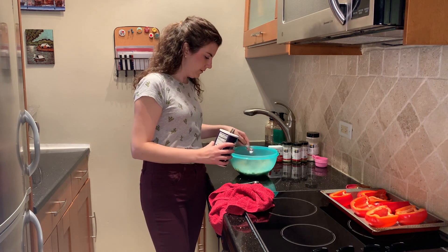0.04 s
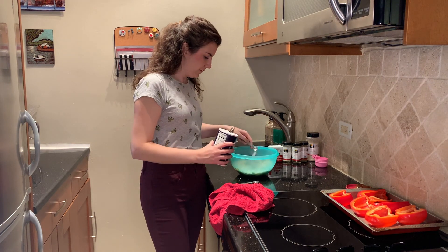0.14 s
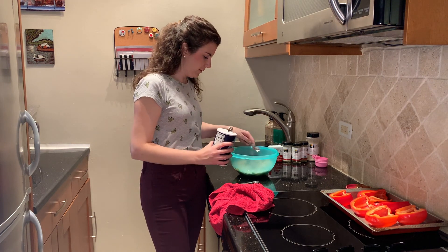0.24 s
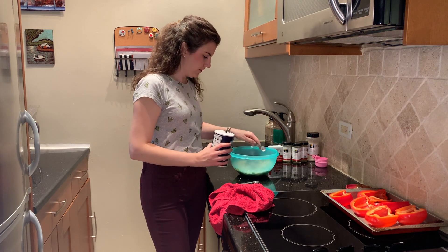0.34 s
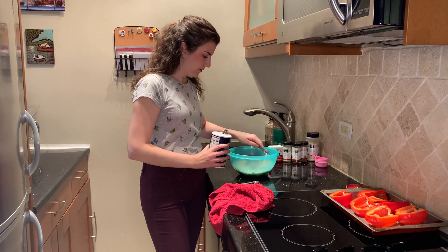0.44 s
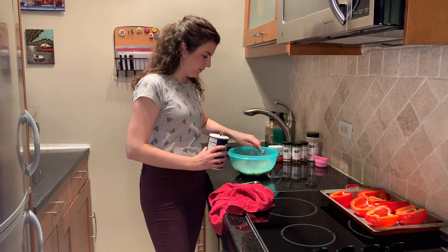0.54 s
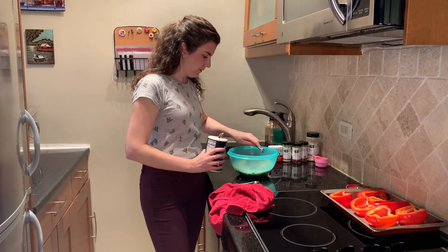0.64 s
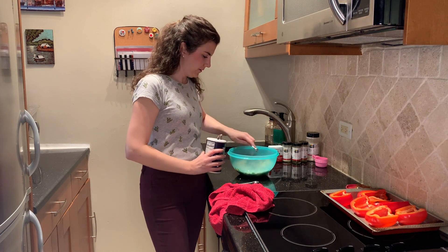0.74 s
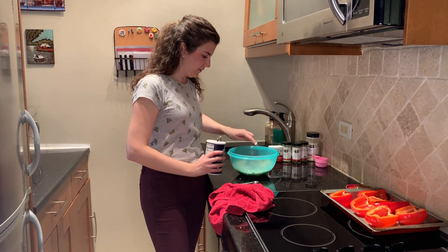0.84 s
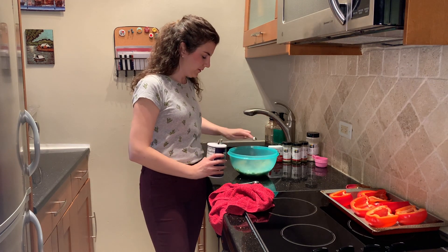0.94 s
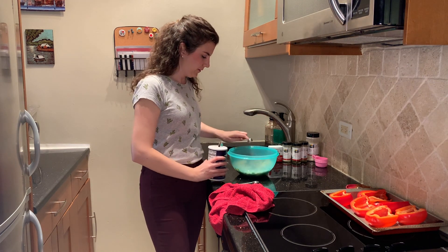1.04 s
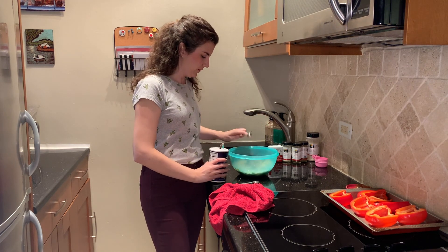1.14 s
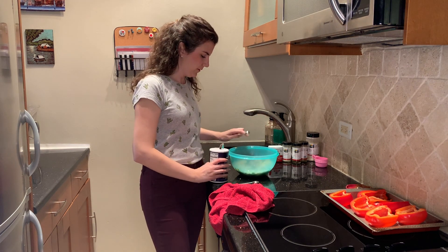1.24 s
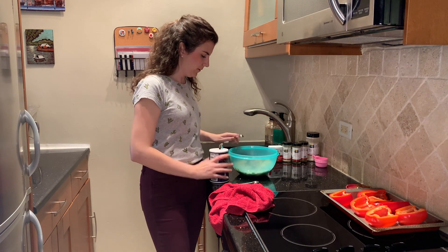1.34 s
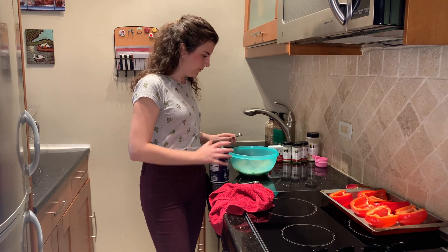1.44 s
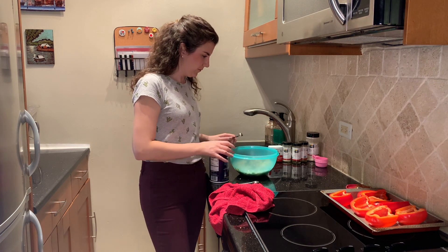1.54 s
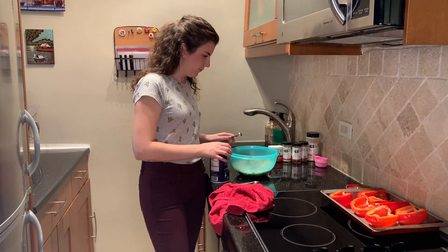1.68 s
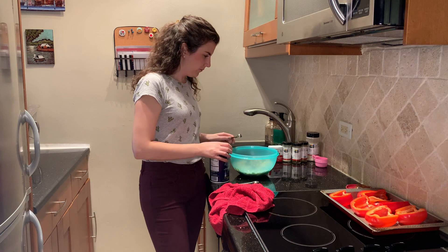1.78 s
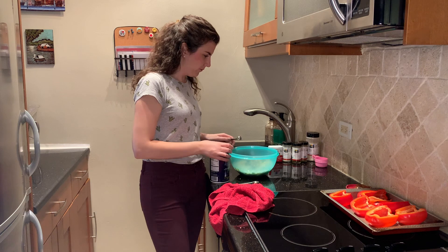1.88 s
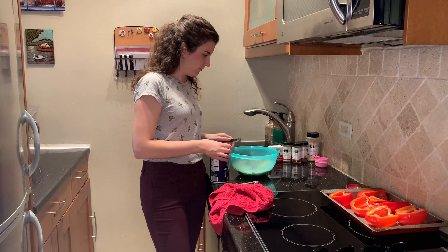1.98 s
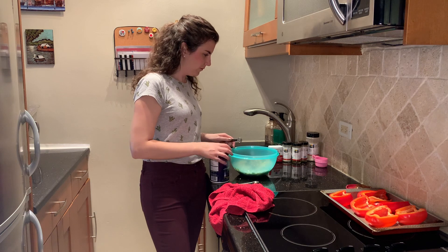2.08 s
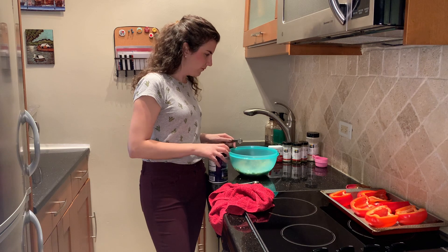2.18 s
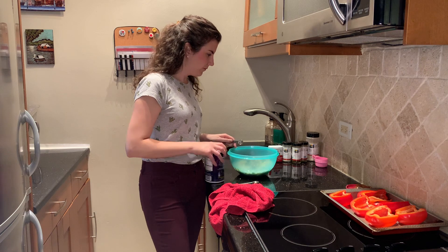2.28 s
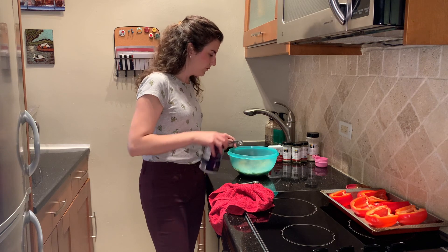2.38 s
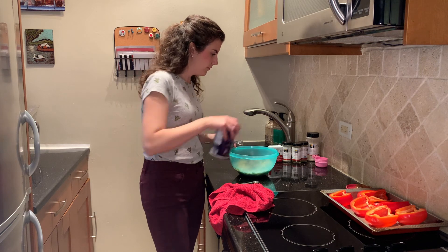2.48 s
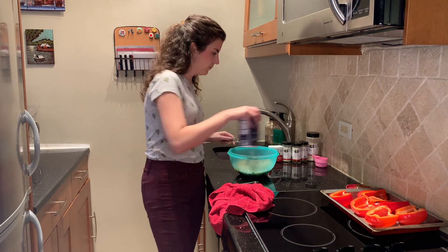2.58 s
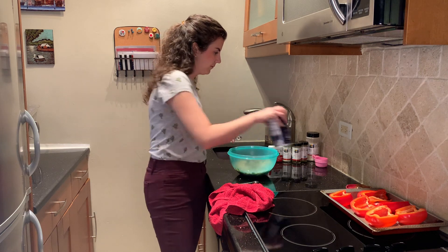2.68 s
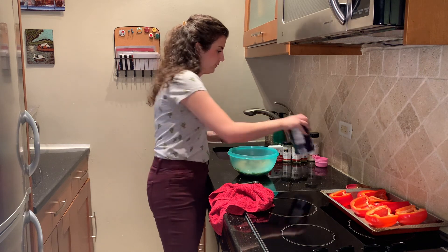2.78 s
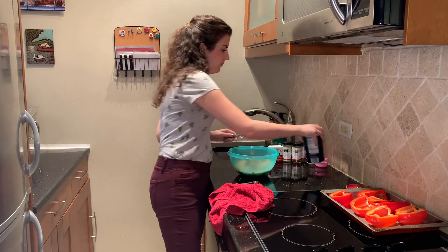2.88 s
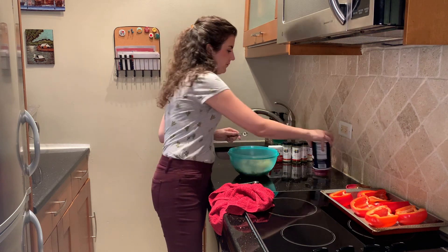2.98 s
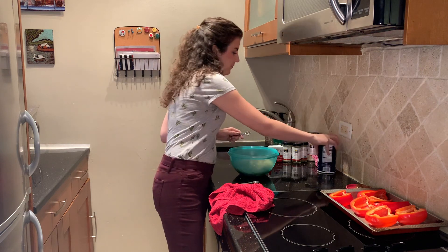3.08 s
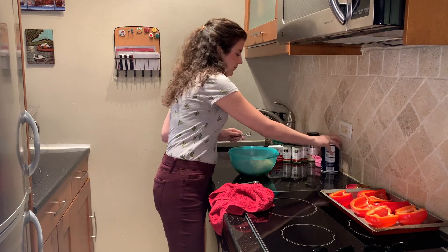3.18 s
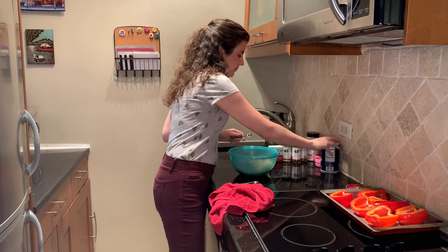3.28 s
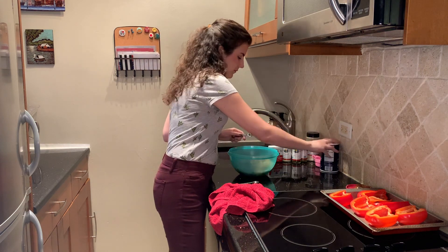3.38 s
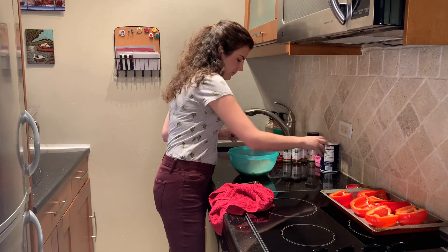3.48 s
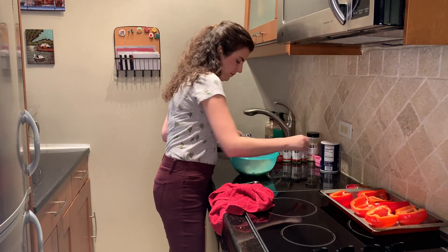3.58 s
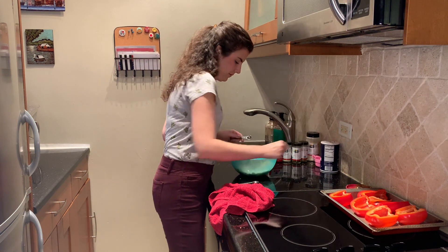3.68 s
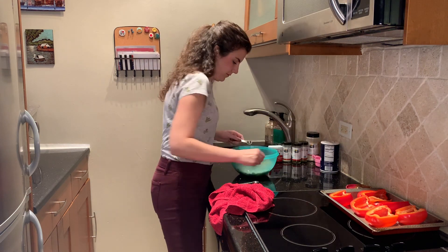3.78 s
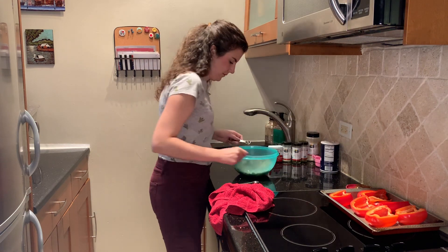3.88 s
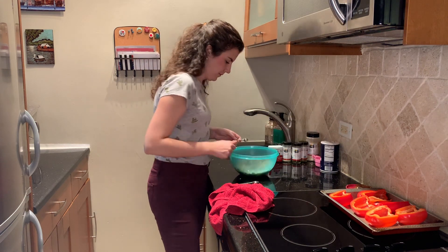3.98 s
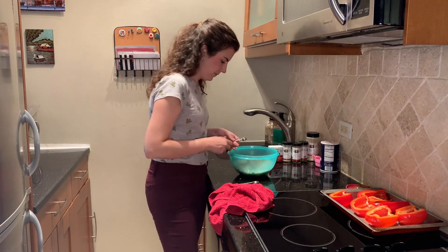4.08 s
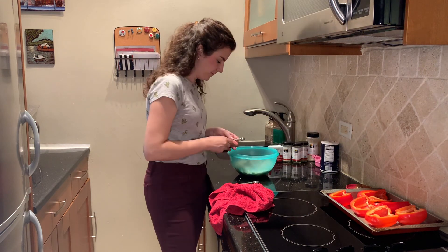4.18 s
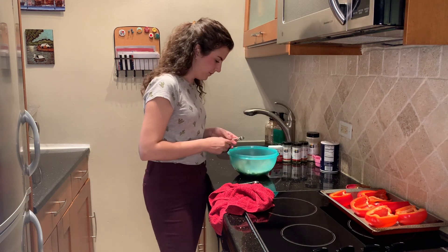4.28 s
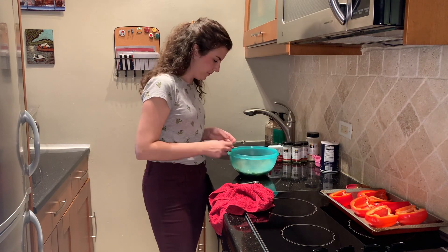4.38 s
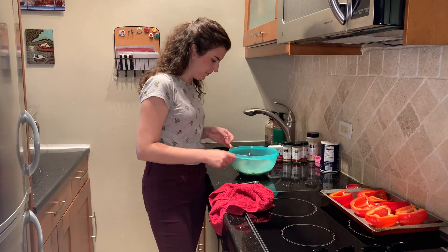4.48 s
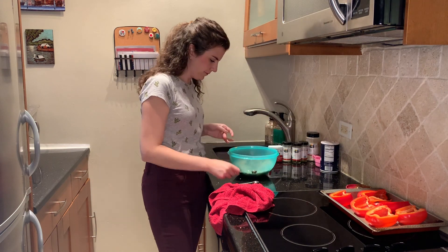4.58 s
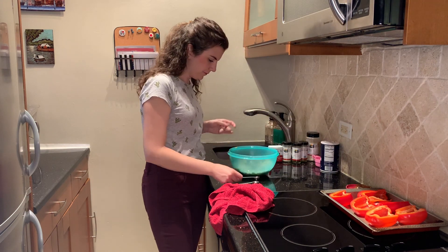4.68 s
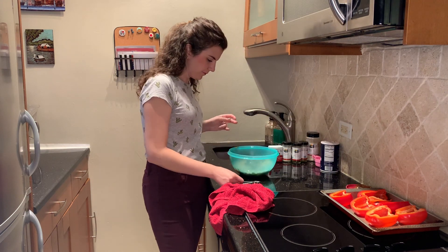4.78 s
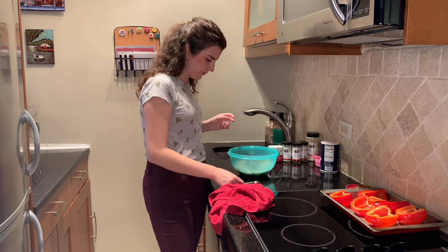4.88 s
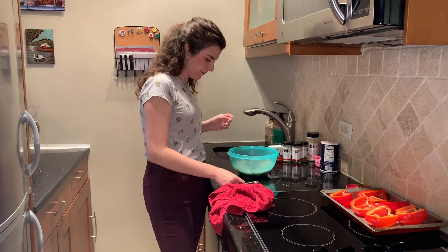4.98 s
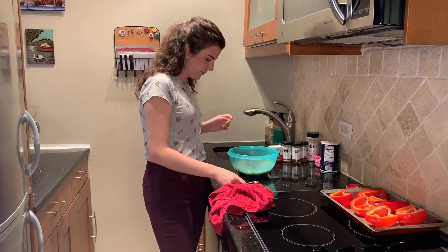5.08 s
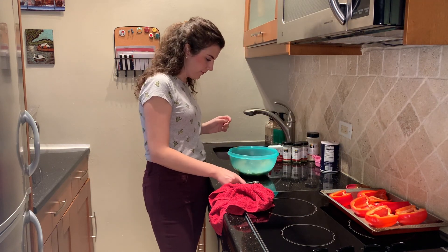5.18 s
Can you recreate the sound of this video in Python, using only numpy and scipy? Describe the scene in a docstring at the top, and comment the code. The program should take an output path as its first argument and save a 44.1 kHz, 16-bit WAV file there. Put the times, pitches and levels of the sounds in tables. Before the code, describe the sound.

In a small tiled kitchen over low rumble, a cardboard salt carton ticks, scrapes and snaps shut, then is put down on the counter.

```python
"""A cardboard salt carton is handled in a small tiled kitchen, over low rumble, two loose hums and a hiss.
Salt and fingers slide and tick (coloured random grains, short ringing blips); the carton is set on the hob
(brief contacts excite damped modes); its spout scrapes and squeaks shut (friction noise through resonances)
and snaps, with a rustling tail; lifted, the salt slides inside; the carton is put down at the back of the
counter. Decaying noise, band by band, echoes all handling."""
import sys
import numpy as np
from scipy import signal
from scipy.fft import rfft, irfft, next_fast_len
from scipy.io import wavfile

SR = 44100
rng = np.random.default_rng(int(sys.argv[2]) if len(sys.argv) > 2 else 0)


def generate_wav(sig):
    """Save sig (samples, or channels by samples) to the path in sys.argv[1] as 16-bit PCM at SR."""
    pcm = np.round(np.clip(np.atleast_2d(sig).T, -1, 1) * 32767).astype(np.int16)
    wavfile.write(sys.argv[1], SR, pcm)


N = 230946
TIME = np.arange(N) / SR  # seconds
EDGES = 22 * 2 ** np.arange(0, 9.7, 1 / 3)  # third-octave band edges, Hz

# Spectrum of appliances, ventilation and hiss, before level scaling: pitch_hz, density_db_per_hz
RUMBLE = [(20, -31), (41, -17.5), (62, -5), (100, -5.5), (141, -9.5), (240, -6.5), (394, -11.5), (500, -16),
          (620, -17.5), (900, -23.5), (1480, -48), (3000, -49.5), (6900, -58.5), (9000, -53.5),
          (16000, -53)]
# Course of the rumble's low part: time_s, level_db
RUMBLE_LEVEL = [(0.0, -53), (0.6, -55.5), (1.3, -52.5), (1.6, -55.5), (2.9, -55), (3.2, -49.5),
                (3.55, -55.5), (5.24, -54)]
STEADY_ABOVE_HZ, STEADY_DB = 1300, -51.5
# Left-right correlation of the noise bands as generated: pitch_hz, likeness (0 to 1)
LIKENESS = [(60, 0.93), (130, 0.89), (200, 0.89), (380, 0.39), (700, 0.12), (1300, 0.08), (16000, 0.017)]
# Course of the two hums: time_s, lower_level_db, upper_level_db
HUM = [(0.0, -69, -50.5), (0.4, -81, -72), (0.9, -63, -59), (1.4, -63, -55), (1.9, -54.5, -62.5),
       (2.8, -60.5, -61), (3.45, -54, -61.5), (3.65, -70.5, -62.5), (5.24, -58.5, -59.5)]
# Mean pitches of the lower and upper hum: pitch_hz
HUM_HZ = (56.7, 80.2)

# Slides of salt and fingers on cardboard, and the rustling tail of the snap at 1.874 s, one swell each:
# peak_s, rise_s, fall_s, bright_rush_db, dull_rub_db, finest_grains_db
SLIDES = [(0.807, 0.027, 0.065, -74.5, -71.5, -85), (0.98, 0.041, 0.04, -80.5, -88, -82),
          (1.09, 0.049, 0.043, -79.5, -97, -78), (1.149, 0.028, 0.055, -77, -69, -73),
          (1.285, 0.037, 0.03, -61, -74, -73), (1.322, 0.046, 0.035, -71, -65, -65),
          (1.874, 0.045, 0.12, -75, -40.5, -82), (2.06, 0.12, 0.07, -81, -58, -77),
          (2.205, 0.11, 0.084, -75.5, -67, -76), (2.484, 0.12, 0.16, -65.5, -82.5, -61),
          (2.69, 0.097, 0.29, -82, -76.5, -98), (2.834, 0.094, 0.093, -59, -73.5, -72),
          (2.93, 0.11, 0.11, -82, -72.5, -63), (3.069, 0.049, 0.14, -70, -51.5, -59.5),
          (3.19, 0.07, 0.19, -77, -61.5, -72), (3.305, 0.073, 0.056, -73, -76, -82),
          (3.389, 0.073, 0.036, -86, -62, -83), (3.66, 0.028, 0.055, -86, -99, -71),
          (3.71, 0.031, 0.053, -86, -81, -76), (3.86, 0.044, 0.045, -91, -84, -80.5),
          (3.915, 0.033, 0.031, -89, -89.5, -70), (4.199, 0.69, 0.71, -91, -90, -89.5)]
SWELL_DB, SWELL_ROUNDNESS = 25.5, 1.35  # drop one rise before or one fall after the peak; exponent
# Spectrum of the bright rush: pitch_hz, density_db_per_hz
SLIDE_BRIGHT = [(3000, -34.5), (5500, -24.5), (7000, -9), (8500, -10), (10000, 3.5), (12000, -18),
                (14000, -1.5)]
# Spectrum of the duller rub of fingers and of the snap's tail: pitch_hz, density_db_per_hz
SLIDE_DULL = [(700, 11.5), (1500, 3), (2200, -3), (4500, -9), (6500, -18.5), (9000, -25)]
# Spectrum of the finest grains: pitch_hz, density_db_per_hz
SLIDE_FINE = [(9000, -24), (12000, -8), (14000, -7.5), (16500, -5)]

# Small ticks of grains and fingernails: start_s, level_db, pitch_hz
TICKS = [(0.7955, -65, 11100), (0.8034, -54, 10500), (0.8055, -45.5, 9700), (0.9762, -62, 9900),
         (1.143, -54, 12000), (1.2803, -49, 10300), (1.282, -48, 9800), (1.2845, -54, 6500),
         (1.287, -56, 10200), (1.2978, -52, 9550), (1.323, -50, 9700), (1.64, -57, 5550),
         (2.7574, -61, 6900), (2.761, -56, 6650), (2.9373, -46.5, 7200), (2.937, -50, 11300),
         (3.14, -48.5, 7100), (3.143, -50, 7500), (3.181, -40, 12800), (3.1845, -61, 10200),
         (3.2502, -43, 9250), (3.2475, -56, 6000), (3.308, -53, 10700), (3.36, -58, 3100),
         (3.395, -54.5, 2300), (3.4, -70, 4500), (3.655, -63.5, 14000), (3.907, -63, 14000)]
TICK_T60_S, TICK_ROOM_SHARE = 0.004, 0.29  # the share is an amplitude gain into the room
PUFF_DB, PUFF_T60_S, PUFF_OCTAVES = -5.5, 0.006, 0.39  # PUFF_OCTAVES reaches to either side of the pitch

# Reverberation of the kitchen by band: pitch_hz, t60_s, echo_db
KITCHEN = [(101.2, .45, -8.5), (222, 0.37, -7), (453.3, 0.62, -1.5), (950, 0.36, 1.5), (3020, 0.42, 3.5),
           (8300, 0.15, 6.5), (16400, 0.14, -2.5)]
FIRST_ECHO_S, NEAR_T60_S, NEAR_DB = 0.005, 0.045, 1.5
ECHO_SIDE_DB = 1.5  # gain of the left-right difference in the echoes

# Modes of the carton set on the hob: pitch_hz, level_db, t60_s
ON_HOB = [(201.7, 4, 0.13), (245, 3.5, 0.089), (312, -6.5, 0.042), (450, -5.5, 0.011), (610, -6, 0.013),
          (830, -25, 0.0073)]
# Modes of the spout's snap: pitch_hz, level_db, t60_s
SNAP = [(336.6, -6.5, 0.049), (396, -4.5, 0.11), (429.9, 1.5, 0.11), (500, -2, .04), (592, 1, 0.05),
        (661, 1, 0.013), (767, 2, 0.057), (884, -3.5, 0.0134), (945, -9, 0.013), (1280, -3, 0.017),
        (1478, -2.5, 0.026), (1641, -8.5, 0.027), (1922, -7, 0.036), (2300, 0, 0.009), (2700, 3, 0.0079),
        (2940, -14.5, 0.00546), (3920, -17, 0.004), (5240, -27, 0.0031), (7500, -8.5, 0.018)]
# Modes of the carton put down on the counter: pitch_hz, level_db, t60_s
ON_COUNTER = [(143, -9, 0.13), (207, -3.5, 0.03), (286, 1, 0.08), (447, -11, 0.05), (580, -3, .02),
              (630, 0.5, 0.025), (720, 0.5, 0.034), (900, -3.5, 0.031), (1090, 1.5, 0.012), (1190, -8, .07),
              (1320, -11, 0.0027), (1800, -39, 0.011), (2960, -18.5, 0.015)]
# Blows on hob, at the spout and on counter: start_s, rattle_drive_db, rattle_t60_s, modes, contacts;
# each contact: after_s, ring_drive_db, crack_db, hardness_hz
BLOWS = [(1.144, -60, 0.04, ON_HOB, [(0, -41.5, -58, 1190), (.0055, -31.5, -75, 500)]),
         (1.8551, -45, 0.05, SNAP, [(0, -27, -27.5, 1300), (.0048, -30.5, -32, 7000),
         (.0112, -38, -51.5, 900)]), (3.0509, -58.5, 0.07, ON_COUNTER, [(0, -42, -40.5, 2500),
         (.0014, -24.5, -38, 2040), (.0058, -27, -45.5, 788)])]
CRACK_T60_S, RATTLE_CUT_HZ = 0.004, 1880

# Friction of the spout pushed shut in its slot, before the bass cut: time_s, ringing_db, hiss_db
SCRAPE = [(1.62, -92, -95.5), (1.636, -95, -74), (1.684, -62, -59.5), (1.7, -60.5, -51),
          (1.736, -57, -52.5), (1.814, -60, -59.5), (1.853, -53, -52)]
# Resonances of the spout: pitch_hz, width_hz, level_db
SPOUT = [(1800, 92, 1.5), (2100, 500, -11), (2980, 250, 0.5), (4060, 260, -7), (4500, 3600, 0.5)]
# Spectrum of the broad hiss beside them: pitch_hz, density_db_per_hz
SCRAPE_HISS = [(500, 13.5), (1100, -12), (3000, -1), (5000, -2.5), (9500, 0.5), (11500, -4), (16000, -2.5)]
# Singing of the spout's free end, mostly rising as it closes: time_s, pitch_hz, level_db
SQUEAK = [(1.66, 2500, -87), (1.682, 2520, -64.5), (1.712, 2500, -60.5), (1.748, 2670, -57.5),
          (1.785, 2730, -63), (1.81, 2770, -72.5), (1.85, 2700, -65)]
SQUEAK_WIDTH_HZ = 127
RUBBING_ROOM_SHARE = 0.98  # amplitude gain of scrape and squeak into the room

SHARED_ABOVE_HZ, LAG_S, IN_PHASE_HZ = 6500, 0.00021, 10905
CUTOFF_HZ = 16100


def amp(db):
    """Decibel law: level to amplitude gain."""
    return 10 ** (np.asarray(db) / 20)


def rms_one(x):
    """Power normalisation: scales a signal to rms 1."""
    return x / np.sqrt(np.mean(x ** 2) + 1e-20)


def at_hz(points, hz):
    """Logarithmic pitch scale: interpolates a table of pitch and value."""
    points = np.array(points)
    return np.interp(np.log(hz), np.log(points[:, 0]), points[:, 1])


def column(rows, index, outside=-130):
    rows = np.array(rows)
    return np.interp(TIME, rows[:, 0], rows[:, index], left=outside, right=outside)


def shape(x, spectrum):
    """Spectral filtering: colours noise by a table of pitch and decibels, to rms 1."""
    hz = np.maximum(np.fft.rfftfreq(N, 1 / SR), 1)
    return rms_one(irfft(rfft(x) * amp(at_hz(spectrum, hz)), N))


def low_passed(x, cut_hz):
    """Low-pass filtering: dulls a signal above cut_hz."""
    return signal.sosfilt(signal.butter(3, cut_hz, fs=SR, output="sos"), x)


def high_passed(x, cut_hz, order):
    """High-pass filtering: thins a signal below cut_hz."""
    return signal.sosfilt(signal.butter(order, cut_hz, "high", fs=SR, output="sos"), x)


def drift(rate_hz):
    """Slow random fluctuation: noise through two one-pole low-passes, to rms 1."""
    step = 40  # samples between drawn values
    pole = np.exp(-2 * np.pi * rate_hz * step / SR)
    noise = rng.standard_normal(N // step + 2002)
    slow = signal.lfilter([1], [1, -2 * pole, pole * pole], noise)[2000:]
    return np.interp(np.arange(N) / step, np.arange(len(slow)), rms_one(slow))


def ring(clicks, hz, t60):
    """Damped resonance: a unit click starts a decaying sine of initial height 1."""
    radius, angle = amp(-60 / (t60 * SR)), 2 * np.pi * hz / SR
    return signal.lfilter([0, np.sin(angle)], [1, -2 * radius * np.cos(angle), radius ** 2], clicks + 1e-18)


def grains(per_s, spread_db):
    """Shot noise: random clicks of uneven size and either sign."""
    sizes = amp(spread_db * np.minimum(rng.exponential(1, N), 5)) * rng.choice([-1, 1], N)
    return sizes * (rng.random(N) < per_s / SR)


def burst(noise, s, t60):
    """Exponential decay: noise that starts at s and dies away."""
    return noise * (TIME >= s) * amp(-60 * np.clip(TIME - s, 0, 1) / t60)


def stereo_bands(length):
    """Diffuse-field correlation: third-octave stereo noise, as alike as at two close receivers."""
    white = rng.standard_normal((2, 2, length))
    for k, (low, high) in enumerate(zip(EDGES, EDGES[1:])):
        # neighbouring bands use separate noises
        band_pass = signal.butter(2, [low, high], "band", fs=SR, output="sos")
        mid, side = signal.sosfilt(band_pass, white[k % 2])
        hz = np.sqrt(low * high)
        alike = np.clip(at_hz(LIKENESS, hz), 0, 1)
        yield hz, np.sqrt(1 + alike) * mid + np.sqrt(1 - alike) * side * [[1], [-1]]


def hum(hz, level_db):
    """Frequency and amplitude modulation: a low tone wavers in pitch and strength."""
    pitch_hz = hz + 2.44 * drift(2)
    strength = amp(level_db + 1.0 * drift(3.2))
    return strength * np.sin(2 * np.pi * np.cumsum(pitch_hz) / SR)


def rumble():
    """Band-filtered noise: low bands waver and swell under a treble of steady mean level, beside two hums."""
    bands = []
    for hz, band in stereo_bands(N):
        bands.append((hz, amp(at_hz(RUMBLE, hz) + 2.52 * drift(9.7)) * band))
    whole = np.std(sum(band for hz, band in bands))
    low = sum(band for hz, band in bands if hz < STEADY_ABOVE_HZ) / whole
    high = sum(band for hz, band in bands if hz >= STEADY_ABOVE_HZ) / whole
    tones = sum(hum(hz, column(HUM, index=k + 1, outside=None)) for k, hz in enumerate(HUM_HZ))
    return amp(column(RUMBLE_LEVEL, index=1, outside=None)) * low + amp(STEADY_DB) * high + tones


def swell(s, rise, fall):
    """Amplitude envelope: a rounded rise to the peak at s and a rounded fall, in dB."""
    away = np.where(TIME < s, (s - TIME) / rise, (TIME - s) / fall)
    return -SWELL_DB * np.minimum(away, 5) ** SWELL_ROUNDNESS


def sliding():
    """Granular friction: grains rush, the finest highest; a coarser rub gives fingers and the snap's tail."""
    levels = 0
    for s, rise, fall, *db in SLIDES:
        levels = levels + np.outer(amp(db), amp(swell(s, rise, fall)))
    bright, dull, fine = levels
    rush = grains(per_s=20000, spread_db=4.5) * amp(2.177 * drift(45))
    rub = grains(per_s=2100, spread_db=-1.0) * amp(3.1 * drift(40))
    return bright * shape(rush, SLIDE_BRIGHT) + dull * shape(rub, SLIDE_DULL) + fine * shape(rush, SLIDE_FINE)


def ticks():
    """Impulse response: each tick is a blip of ringing with a short, broad puff of noise around its pitch."""
    out, noise = np.zeros(N), rng.standard_normal(N)
    after = TIME[:SR // 20]
    for s, db, hz in TICKS:
        start = round(s * SR)
        span = slice(start, start + SR // 20)
        edges_hz = [hz / 2 ** PUFF_OCTAVES, min(hz * 2 ** PUFF_OCTAVES, 0.45 * SR)]
        band_pass = signal.butter(1, edges_hz, "band", fs=SR)
        puff = signal.lfilter(*band_pass, noise[span] * amp(PUFF_DB - 60 * after / PUFF_T60_S))
        out[span] += amp(db) * (ring(after == 0, hz, TICK_T60_S) + puff)
    return out


def kitchen(x):
    """Reverberation: quick reflections off near tiles and counter, then the room, each band with its decay."""
    after, rows = TIME[:SR // 2], np.array(KITCHEN)
    tail = 0
    for width, (hz, band) in zip(np.diff(EDGES), stereo_bands(len(after))):
        t60, echo_db = at_hz(rows, hz), at_hz(rows[:, [0, 2]], hz)
        far = amp(-60 * after / t60) / np.sqrt(t60)
        near = amp(NEAR_DB - 60 * after / NEAR_T60_S) / np.sqrt(NEAR_T60_S)
        echo = band * np.hypot(far, near) * (after > FIRST_ECHO_S)
        energy = np.sum(echo ** 2, axis=1, keepdims=True)
        # each band returns its share of a click's energy
        tail = tail + amp(echo_db) * echo * np.sqrt(2 * width / SR / energy)
    size = next_fast_len(N + len(after))
    return irfft(rfft(x, size) * rfft(tail, size), size)[:, :N]


def blows():
    """Modal excitation: contacts, hard or soft, and a brief rattle drive the modes; contacts crack brightly."""
    sample, noise = np.arange(N), rng.standard_normal(N)
    bright = high_passed(noise, 3500, order=2)
    for s, rattle_db, rattle_t60, modes, contacts in BLOWS:
        push = amp(rattle_db) * low_passed(burst(noise, s, rattle_t60), RATTLE_CUT_HZ)
        crack = 0
        for after_s, ring_db, crack_db, hard_hz in contacts:
            click = (sample == round((s + after_s) * SR)) + 1e-18
            push = push + amp(ring_db) * low_passed(click, hard_hz)
            crack = crack + amp(crack_db) * burst(bright, s + after_s, CRACK_T60_S)
        body = sum(amp(db) * ring(push, hz, t60) for hz, db, t60 in modes)
        # a small body radiates little below its lowest mode
        lowest_hz = modes[0][0]
        yield high_passed(body, lowest_hz, order=3) + crack


def scrape():
    """Friction-driven resonance: rubbing rings the thin spout beside a broad hiss; little sounds below 350 Hz."""
    rub = grains(per_s=4000, spread_db=-0.5) * amp(0.87 * drift(32))
    tone = 0
    for hz, width, db in SPOUT:
        t60 = np.log(1000) / (np.pi * width)
        tone = tone + amp(db) * rms_one(ring(rub, hz, t60))
    ringing = amp(column(SCRAPE, index=1)) * rms_one(tone)
    hiss = amp(column(SCRAPE, index=2)) * shape(rub, SCRAPE_HISS)
    return high_passed(ringing + hiss, 350, order=2)


def squeak():
    """Narrow-band noise: friction noise modulates a carrier that follows the spout's changing pitch."""
    pole = np.exp(-np.pi * SQUEAK_WIDTH_HZ / SR)
    wobble = signal.lfilter([1], [1, -pole], rng.standard_normal((2, N)))
    phase = 2 * np.pi * np.cumsum(column(SQUEAK, index=1, outside=None)) / SR
    tone = wobble[0] * np.cos(phase) + wobble[1] * np.sin(phase)
    return amp(column(SQUEAK, index=2)) * rms_one(tone)


def scene():
    """Superposition: handling sounds directly and through the kitchen, each blow with its own echo, over rumble."""
    background, slides, clicks = rumble(), sliding(), ticks()
    knocks = list(blows())
    rubbing = scrape() + squeak()
    to_room = slides + RUBBING_ROOM_SHARE * rubbing + TICK_ROOM_SHARE * clicks
    left, right = sum(map(kitchen, knocks)) + kitchen(to_room)
    middle, side = (left + right) / 2, (left - right) / 2
    echoes = middle + amp(ECHO_SIDE_DB) * side * np.array([[1], [-1]])
    return sum(knocks) + slides + clicks + rubbing + echoes + background


def record(dry):
    """Interchannel delay: both channels share one treble, the left a little late; the top is cut."""
    size = next_fast_len(N + SR // 10)
    hz = np.fft.rfftfreq(size, 1 / SR)
    left, right = rfft(np.pad(dry, [(0, 0), (0, size - N)], "reflect"))
    shared = 1 / (1 + (SHARED_ABOVE_HZ / np.maximum(hz, 1)) ** 12)
    early = left * np.exp(2j * np.pi * (hz - IN_PHASE_HZ) * LAG_S)
    right = np.sqrt(1 - shared) * right + np.sqrt(shared) * early
    cut = signal.cheby2(14, 60, CUTOFF_HZ, fs=SR, output="sos")  # 60 dB down from CUTOFF_HZ up
    return signal.sosfilt(cut, irfft([left, right], size)[:, :N])


dry = scene()
out = record(dry)
generate_wav(out)
```